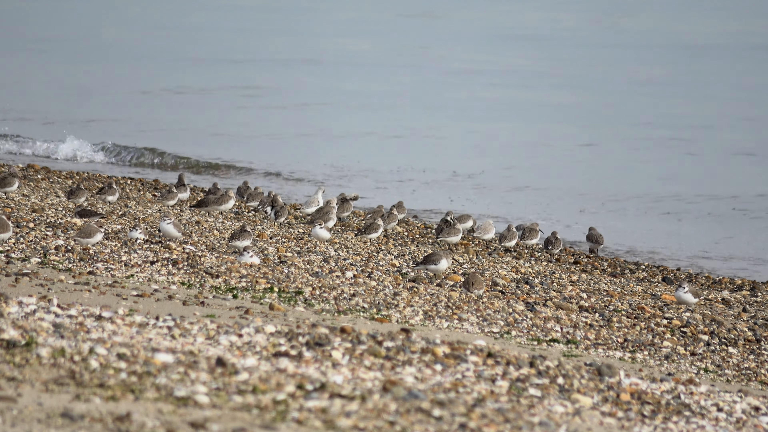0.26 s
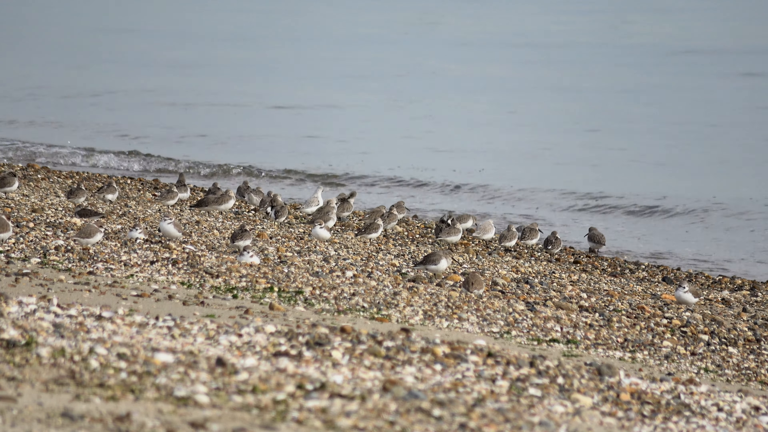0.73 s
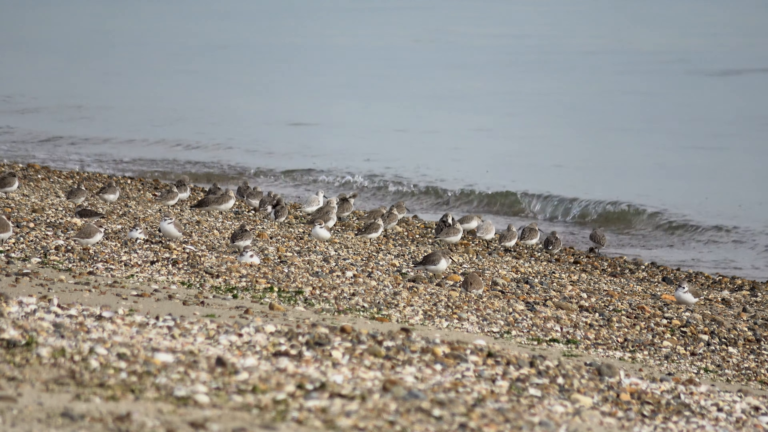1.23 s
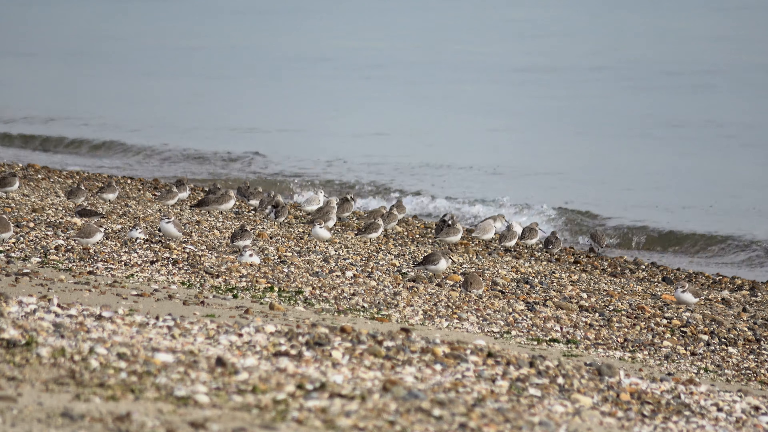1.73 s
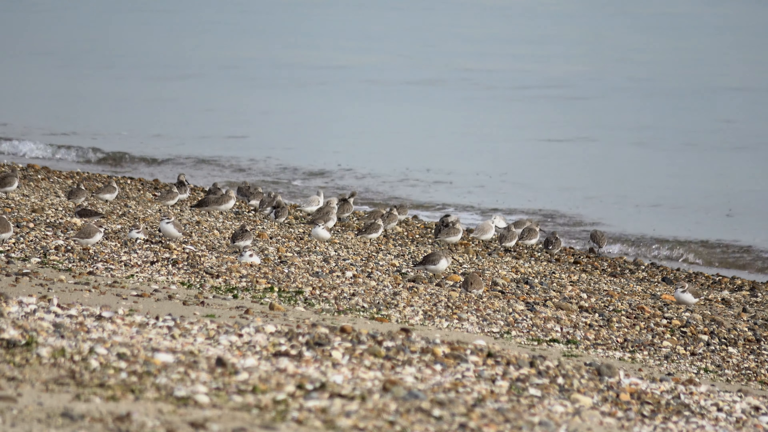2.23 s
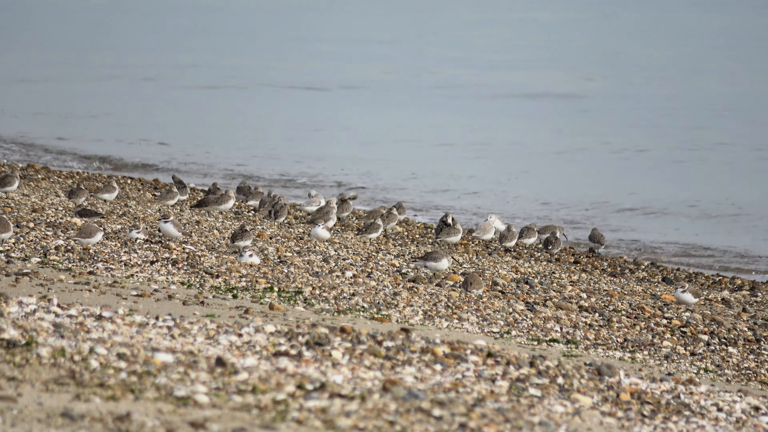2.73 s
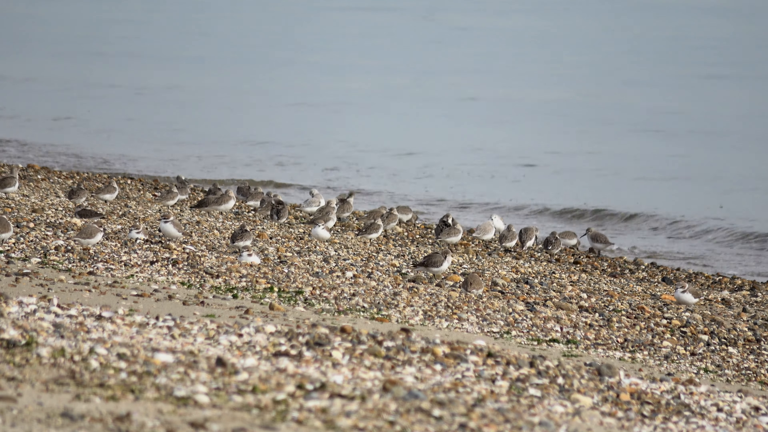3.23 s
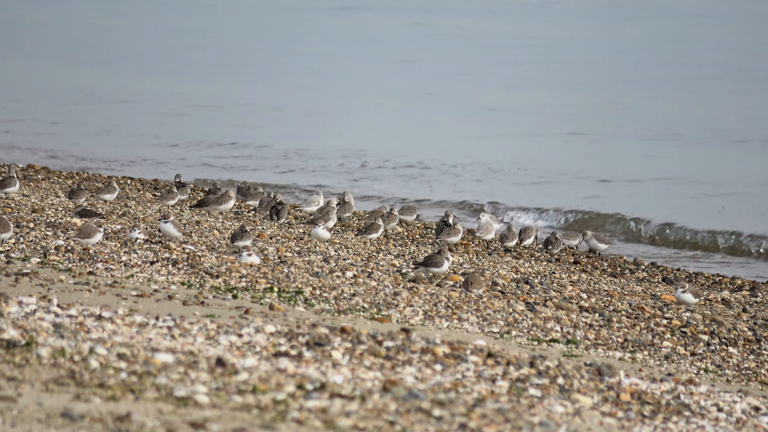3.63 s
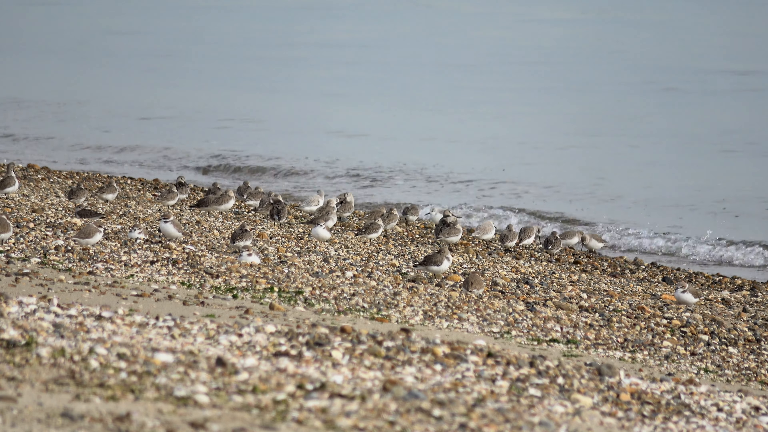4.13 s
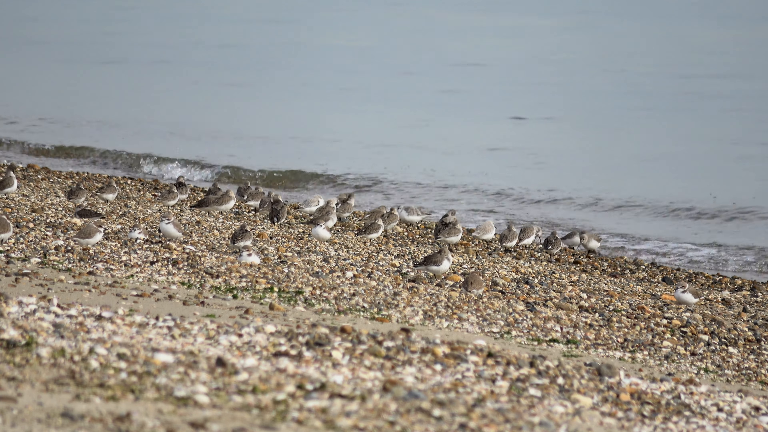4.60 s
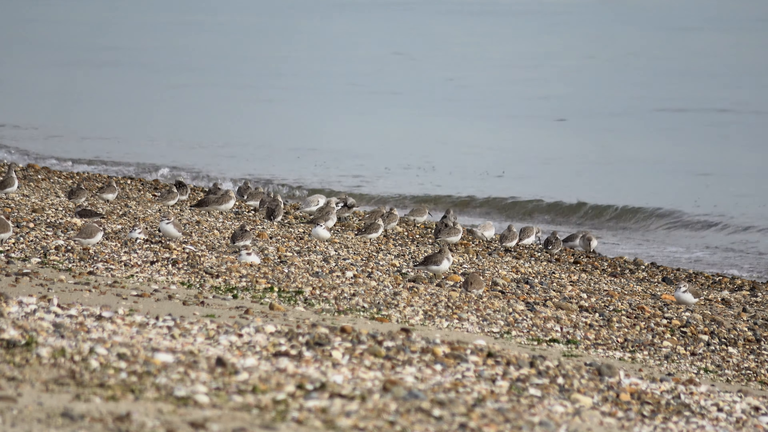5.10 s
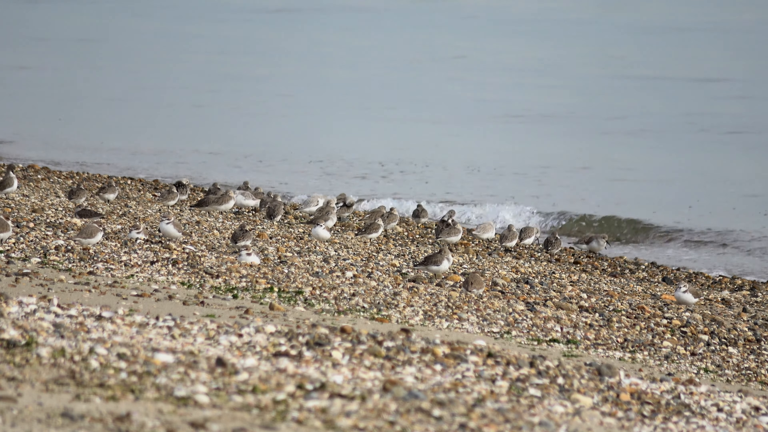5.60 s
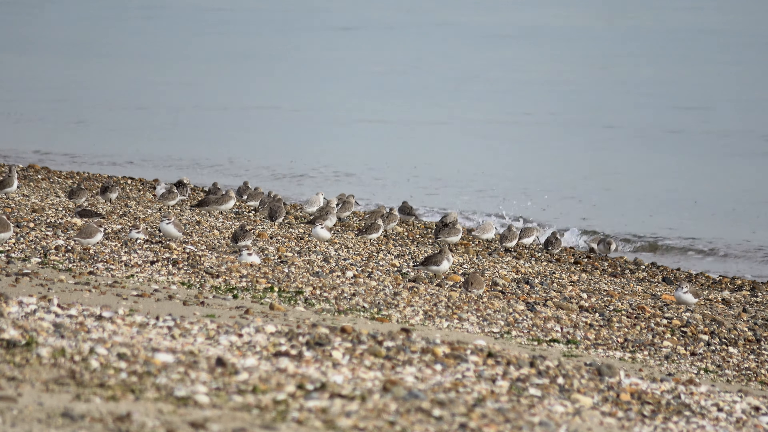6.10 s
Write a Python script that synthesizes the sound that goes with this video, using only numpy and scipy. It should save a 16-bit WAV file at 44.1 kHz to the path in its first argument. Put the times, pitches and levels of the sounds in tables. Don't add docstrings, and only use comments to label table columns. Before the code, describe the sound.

On an open shell beach, small waves wash in right of centre. One builds to a bubbly, splashing break at about a second and a half, then drains away to near quiet. A second, longer wash rises after four seconds with hollow plops and fizz, then fades. Sharp little shell clicks dot it. Low wind rumble, a faint far engine and microphone hiss stay underneath.

```python
import sys
import numpy as np
from scipy import signal
from scipy.fft import rfft, irfft, next_fast_len
from scipy.io import wavfile
from scipy.ndimage import uniform_filter1d, map_coordinates

SR = 44100
rng = np.random.default_rng(int(sys.argv[2]) if len(sys.argv) > 2 else 0)


def natural_amplitude(level_db):
    exponent = np.asarray(level_db, float) / 20
    return 10 ** exponent


def waveform_to_disk(signal):
    frames = np.transpose(np.atleast_2d(signal))
    scaled = np.clip(frames, -1, 1) * 32767
    samples = np.round(scaled).astype(np.int16)
    wavfile.write(sys.argv[1], SR, samples)


N = 280035

# time in seconds, strength in dB, froth on top in dB, left minus right in dB.
WAVE = [(0.0, -57.5, -6.5, -8.5), (0.17, -56.5, -10, -13), (0.64, -61.5, -14, -16), (0.78, -56.5, -3, -11),
        (1.05, -49.5, -4, -8.5), (1.38, -43.5, -5.5, -8), (1.64, -41.5, -7, -8.5), (1.86, -47, -7, -7),
        (2.3, -49.5, -7.5, -4), (2.55, -55, -6.5, -3.5), (3.3, -67, -3.5, -6), (3.55, -61.5, -9.5, -3.5),
        (3.92, -62, -11.5, -2.5), (4.2, -53.5, -4.5, -5.5), (4.58, -46, -4.5, -12), (5.05, -46, -9, -7),
        (5.5, -46, -8, -5.5), (6.35, -62, -8, -9)]
FULL_DB = -45.5


def unit(x):
    return x / np.sqrt(np.mean(x ** 2) + 1e-20)


def curves(rows):
    s, *cols = np.transpose(rows)
    return [np.interp(np.arange(N) / SR, s, c) for c in cols]


def wobble(rate):
    knots = rng.standard_normal(int(N * 40 / SR))
    return map_coordinates(knots, [np.arange(N) * rate / SR])


def coloured(x, spectrum):
    m = next_fast_len(N + 8192)
    hz, db = np.transpose(spectrum)
    bins = np.log(np.fft.rfftfreq(m, 1 / SR) + 1)
    gain = natural_amplitude(np.interp(bins, np.log(hz), db, left=-120, right=-120))
    return unit(irfft(rfft(x, m) * gain, m)[:N])


def patches(shape, frames_size):
    field = uniform_filter1d(rng.standard_normal(shape), size=8, axis=0)
    return unit(uniform_filter1d(field, size=frames_size, axis=1))


def rush(patchy_db):
    z = signal.stft(rng.standard_normal(N + 512), nperseg=512)[2]
    gain = natural_amplitude(patchy_db * patches(z.shape, 6))
    return signal.istft(z * gain, nperseg=512)[1][:N]


def rings(s, size, hz, t60, rise, length):
    t, hz, t60 = (np.float32(v) for v in (np.arange(length) / SR, hz, t60))
    age = t / t60[:, None]
    tone = np.sin(2 * np.pi * hz[:, None] * t * (1 + rise * age))
    decay = np.exp(-np.float32(np.log(1000)) * age)
    ring = tone * decay * (1 - np.exp(-18 * age))
    at = (s * SR).astype(int)[:, None] + np.arange(length)
    return np.bincount(at.ravel(), (size[:, None] * ring).ravel(), N + length)[:N]


def foam(spectrum, centre_hz, cycles, spread_db, share, patchy_db, count, size):
    draw = rng.random((count, 3))
    hz = centre_hz * 2 ** (2 * draw[:, 1] - 1)
    strength = natural_amplitude(-spread_db * np.log(1.003 - draw[:, 2]))
    bubbles = rings(draw[:, 0] * N / SR, strength, hz, cycles / hz, rise=0.25, length=size)
    share = np.clip(share, 0, 1)
    mix = np.sqrt(share) * unit(bubbles) + np.sqrt(1 - share) * unit(rush(patchy_db))
    return coloured(mix, spectrum)


def placed(x, pan_db):
    left = 1 / (1 + natural_amplitude(-pan_db))
    return 2 * np.array([left * x, (1 - left) * x])


def strewn(x, pan_db, spread_db):
    z = signal.stft(placed(x, pan_db), nperseg=1024)[2]
    lean = natural_amplitude(spread_db * patches(z.shape[1:], 24))
    return signal.istft(z * [lean, 1 / np.sqrt(lean)], nperseg=1024)[1][:, :N]


def swells(s, heights, length, rise_share):
    coarse = np.arange(0, N + 128, 128)
    late = (coarse / SR - s[:, None]) / np.abs(length)[:, None]
    sums = heights @ np.exp(-np.where(late < 0, late / rise_share, late) ** 2)
    return [np.interp(np.arange(N), coarse, row) for row in sums]


def water():
    # time in seconds, swell in dB, froth in dB, draining in dB, length in seconds.
    surges = [(0.42, -0.7, -1, 1, 0.08), (0.76, 0.5, 1, 0.6, 0.027), (0.88, 0.7, 1, -3, 0.067),
              (1.034, 2.5, 0, -5, 0.04), (1.164, -1.9, 1, -4.5, 0.073), (1.264, -0.3, 1.5, 0, 0.032),
              (2.02, -0.2, 2.3, 2, 0.06), (2.132, -1, -0.5, -2, 0.036), (2.713, -0.6, 0, 1.5, 0.1),
              (2.9, -1.5, 2, 0.3, 0.071), (3.1, -0.5, 1, 1, 0.088), (3.454, -2.5, -0.3, -4.5, 0.03),
              (3.76, -1.8, -1, -7, 0.1), (4.05, 0.5, 2.5, 2, 0.06), (4.188, 0.2, 0, 1.5, 0.04),
              (4.305, -2.2, 0, -2, 0.066), (4.474, -1.8, 2.8, 2.7, 0.072), (4.705, -1.1, -0.5, 0.5, 0.065),
              (4.9, -0.8, 2.5, 0.8, 0.074), (5.21, -3.5, 3.5, 0.5, 0.051), (5.395, -0.4, 2, 2.3, 0.06),
              (5.618, 0, -1.2, 2, 0.06), (5.9, -0.5, -0.5, -1, 0.082), (6.07, 2, -2, -0.3, 0.05)]
    s, *heights, length = np.transpose(surges)
    swell_db, foam_db, drain_db = swells(s, np.array(heights), length, rise_share=0.96)
    wash_db, froth_db, pan_db = curves(WAVE)
    return wash_db + swell_db, froth_db + foam_db, drain_db, pan_db


def falls():
    # time in seconds, plunge in dB, thud in dB, length in seconds, left minus right in dB.
    crests = [(0.22, -53.5, -52.5, 0.18, -19), (0.63, -55, -58, 0.11, -14), (0.97, -56, -49, 0.053, -19),
              (1.154, -49, -46.5, 0.046, -14), (1.318, -45.5, -43.5, 0.081, -7),
              (1.506, -39.5, -45.5, 0.12, -9), (1.743, -47.5, -47, 0.087, -15),
              (1.956, -47, -49.5, 0.063, -10), (2.22, -52.5, -58, 0.11, -8), (3.04, -65, -53.5, 0.1, 0),
              (3.645, -72, -56.5, 0.082, 2), (4.348, -56, -54, 0.2, 12), (4.56, -46, -49.5, 0.089, -8),
              (4.79, -49.5, -46, 0.12, -19), (4.94, -45, -55, 0.087, -11), (5.14, -49.5, -65, 0.044, -11),
              (5.32, -49, -62, 0.03, -6), (5.44, -52, -45.5, 0.07, -11), (5.71, -53, -50.5, 0.13, -4),
              (6.04, -70, -50.5, 0.072, -4)]
    s, plunge_db, thud_db, length, place_db = np.transpose(crests)
    plunge = natural_amplitude(2 * plunge_db)
    heights = np.array([plunge, place_db * plunge, natural_amplitude(2 * thud_db)])
    return swells(s, heights, length, rise_share=0.56)


def drone():
    # time in seconds, strength in dB.
    wind = [(0.0, -51.5), (0.6, -50.5), (1.13, -51), (1.3, -53.5), (2.0, -53.5), (2.9, -52), (3.35, -50.5),
            (4.1, -50), (4.2, -53), (5.0, -53), (5.1, -49.5), (5.3, -49), (5.5, -53), (5.8, -50.5),
            (6.35, -52.5)]
    # frequency in Hz, level in dB per Hz.
    rumble_colour = [(13, -41), (22, -15), (45, -1.5), (70, 2.5), (130, -5.5), (165, -11.5), (220, -7.5),
                     (260, -27.5), (330, -27), (450, -46)]
    # frequency in Hz, width in Hz, level in dB rms.
    engine = [
        (162, 1.2, -53),
        (218, 5, -63),
        (72, 12, -63),
    ]
    gusts = natural_amplitude(curves(wind)[0] + 1.5 + 0.25 * wobble(4.23))
    rumble = gusts * coloured(rng.standard_normal(N), rumble_colour)
    t = np.arange(N) / SR
    for hz, width, db in engine:
        drift = np.cumsum(width * 0.362 * wobble(16)) / SR
        level = natural_amplitude(db + 2 + 0.32 * wobble(3.5))
        rumble = rumble + level * np.sin(2 * np.pi * (hz * t + drift))
    apart = natural_amplitude(-88.0) * coloured(rng.standard_normal(N), rumble_colour)
    return placed(rumble, pan_db=3.0) + apart * [[1], [-1]]


def backdrop():
    # frequency in Hz, level in dB per Hz.
    wide_colour = [(200, -14), (300, -6), (600, -18), (1500, -22), (3000, -23), (5000, -17), (7300, -11),
                   (7900, -45)]
    # frequency in Hz, level in dB per Hz.
    hiss_colour = [(300, -19), (3000, -0.5), (7000, -6), (9000, -4), (12800, -7.5), (15700, -9.5)]
    wide = natural_amplitude(-75.5) * coloured(rush(patchy_db=-1.0), wide_colour)
    hiss = natural_amplitude(-66.5) * coloured(rng.standard_normal(N), hiss_colour)
    return wide * [[1], [-1]] + placed(hiss, pan_db=-0.3)


def scatter():
    noise = coloured(rng.standard_normal(N), [(250, 1), (1000, -6), (15000, -57)])
    return natural_amplitude(water()[0] - 29) * noise * [[1], [-1]]


def ticks():
    # time in seconds, peak in dB, pitch in Hz.
    clicks = [(0.3819, -52, 3470), (0.7012, -51, 6400), (0.7731, -50, 7510), (0.8542, -42, 5880),
              (0.9585, -43, 5470), (1.457, -31.5, 3780), (1.9359, -34, 4950), (1.9838, -37, 4940),
              (2.211, -38.5, 4300), (2.212, -38, 5300), (2.2125, -42, 7690), (2.2332, -45, 4980),
              (2.9816, -49, 3720), (3.032, -47, 2200), (3.3547, -50, 3440), (3.3515, -54, 5230),
              (3.3751, -54, 5200), (3.4972, -52, 2710), (3.6159, -57, 7690), (3.9675, -53, 3620),
              (4.0569, -49, 9240), (4.0906, -52, 7330), (4.109, -46, 6560), (4.1574, -46, 8120),
              (4.1606, -48, 6060), (4.1656, -46, 6900), (4.216, -44, 3520), (4.3574, -46, 7230),
              (4.5637, -36, 5330), (5.2887, -44, 10420)]
    s, db, hz = np.transpose(clicks)
    t60 = 14.0 / hz
    return placed(rings(s, natural_amplitude(db + 10.0), hz, t60, rise=0.075, length=400), water()[3])


def plops():
    # time in seconds, peak in dB, pitch in Hz, left minus right in dB.
    pockets = [(0.243, -38, 247, -10), (0.945, -35, 935, -13), (1.141, -30, 400, -10),
               (1.2433, -32.5, 380, -9), (1.439, -28.5, 463, -10), (1.5018, -28, 198, -4),
               (1.5296, -23, 207, -4), (1.5612, -26, 220, -5), (1.9194, -29, 222, -5),
               (2.0195, -32, 360, -7), (3.3485, -45, 1300, -9), (3.4967, -47, 1200, -1),
               (3.529, -41, 1170, -1), (3.5267, -38.5, 292, 0), (3.5238, -42.5, 475, -4),
               (3.53, -58, 760, -2), (3.631, -46, 1100, -3), (3.817, -48, 1380, -1),
               (3.934, -44.5, 1000, -4), (4.131, -44, 403, -3), (4.3828, -34.5, 227, 2),
               (4.418, -33, 184, 4), (4.523, -32.5, 218, 2), (4.555, -39, 300, -4), (4.61, -34, 262, -8),
               (4.8688, -29, 354, -12), (4.871, -32, 250, -3), (4.9136, -29, 195, -1),
               (5.0227, -30.5, 467, -13), (5.41, -34.5, 250, -6)]
    s, db, hz, pan_db = np.transpose(pockets)
    t60 = 0.04 * (300 / hz) ** 0.84
    sides = placed(natural_amplitude(db + 3.5), pan_db)
    return np.array([rings(s, size, hz, t60, rise=0.12, length=4000) for size in sides])


def backwash():
    # frequency in Hz, level in dB per Hz.
    trickle_colour = [(800, -15), (1700, -2.5), (2300, 1), (3200, -2), (4200, -8.5), (7500, -45)]
    lag_s = 0.043
    wash_db, froth_db, pan_db = curves(np.array(WAVE) + [lag_s, 0, 0, 0])
    db = -46 + 0.71 * (wash_db - FULL_DB) + 0.62 * froth_db + water()[2]
    trickle = foam(trickle_colour, centre_hz=2538, cycles=34.6, spread_db=2.0, share=0.084,
                   patchy_db=1.0, count=9000, size=400)
    return strewn(natural_amplitude(db + 0.65 * wobble(11)) * trickle, 0.87 * pan_db + 1.5, spread_db=-0.5)


def gurgle():
    # frequency in Hz, level in dB per Hz.
    gurgle_colour = [(420, -20), (620, -6.5), (800, -1.5), (1000, -11), (1500, -31)]
    wash_db, _, _, pan_db = water()
    lumps_db = -54.5 + 1.83 * (wash_db - FULL_DB) + 1.5 * wobble(14)
    bubbles = foam(gurgle_colour, centre_hz=817, cycles=14.5, spread_db=2.0, share=0.47,
                   patchy_db=3.0, count=1200, size=1200)
    return placed(natural_amplitude(lumps_db) * bubbles, pan_db - 5.5)


def crest():
    # frequency in Hz, level in dB per Hz.
    plunge_colour = [(120, -57), (200, -7), (300, -1.5), (450, 0.5), (700, -3.5), (1200, -8)]
    # frequency in Hz, level in dB per Hz.
    thud_colour = [(60, -50), (100, 0.5), (140, -0.5), (200, -3.5), (300, -7)]
    wash_db, _, _, pan_db = water()
    fall, place, landing = falls()
    churn = natural_amplitude(2 * (-48 + 0.83 * (wash_db - FULL_DB)))
    power = churn + fall
    lean_db = (churn * (0.66 * pan_db - 2) + place) / power
    bubbles = foam(plunge_colour, centre_hz=322.0, cycles=12.1, spread_db=0.1, share=0.059,
                   patchy_db=1.0, count=1500, size=1600)
    far_thuds = natural_amplitude(2 * -59.5)
    thud = np.sqrt(far_thuds + landing) * coloured(rng.standard_normal(N), thud_colour)
    return placed(np.sqrt(power) * bubbles, lean_db) + placed(thud, pan_db=2.0)


def waves():
    # frequency in Hz, level in dB per Hz.
    wash_colour = [(330, -6.5), (650, -5.5), (800, -2.5), (1050, 0.5), (1500, 2), (2200, -5), (4500, -12.5)]
    fizz_colour = [(2200, -8), (3600, -3), (4800, -1.5), (6200, -3), (8000, -13.5), (11000, -40)]
    spray_colour = [(4500, -34), (7000, -2.5), (9000, -3.5), (12000, -9), (15500, -25)]
    surf_colour = [(200, 4), (300, -1.5), (600, -10), (2000, -15), (4000, -20), (8000, -22.5)]
    wash_db, froth_db, _, pan_db = water()
    over_db = wash_db - FULL_DB
    thrown = falls()[0]
    surge = natural_amplitude(0.46 * wobble(12) + 0.11 * wobble(30))
    sputter = 0.5 * wobble(5.3) + 0.58 * wobble(38)

    wash = foam(wash_colour, centre_hz=1200, cycles=33.7, spread_db=0.0, share=0.096,
                patchy_db=0.94, count=5000, size=900)
    wash = np.sqrt(natural_amplitude(2 * wash_db) + natural_amplitude(2 * -15.5) * thrown) * wash
    fizz = foam(fizz_colour, centre_hz=5010, cycles=8.5, spread_db=2.0, share=0.24,
                patchy_db=2.0, count=15000, size=200)
    fizz = np.sqrt(natural_amplitude(2 * (wash_db + froth_db)) + natural_amplitude(2 * -16) * thrown) * natural_amplitude(sputter) * fizz
    spray = foam(spray_colour, centre_hz=9440, cycles=9.0, spread_db=3.5, share=0.27,
                 patchy_db=1.0, count=25000, size=80)
    spray = natural_amplitude(-51.5 + 1.24 * over_db + 1.14 * froth_db + sputter) * spray
    surf = natural_amplitude(-66) * coloured(rush(patchy_db=2.2), surf_colour)

    body = strewn(surge * wash + surf, 1.17 * pan_db + 0.11 * over_db + 0.8, spread_db=1.4)
    froth = placed(surge * fizz, 0.87 * pan_db - 0.6)
    mist = strewn(surge * spray, 1.03 * pan_db - 0.1 * over_db - 0.9, spread_db=-1.5)
    return body + froth + mist


def scene():
    background = drone() + backdrop() + scatter()
    details = ticks() + plops() + backwash()
    return background + details + gurgle() + crest() + waves()


def low_pass(x):
    return signal.sosfilt(signal.butter(12, 15660, fs=SR, output="sos"), x)


def record(dry):
    return low_pass(dry)


dry = scene()
out = record(dry)
waveform_to_disk(out)
```